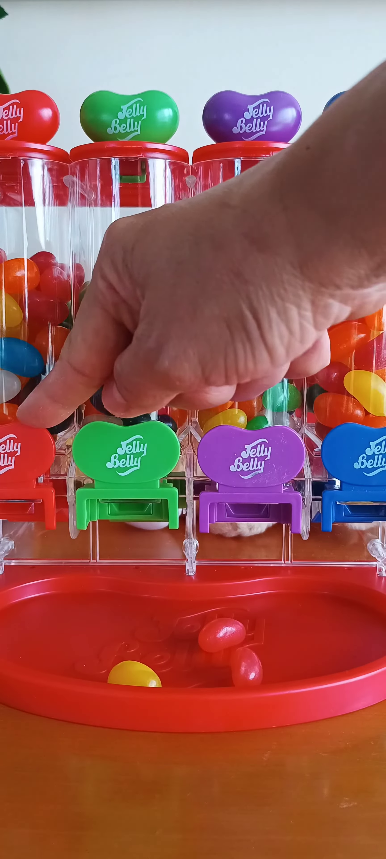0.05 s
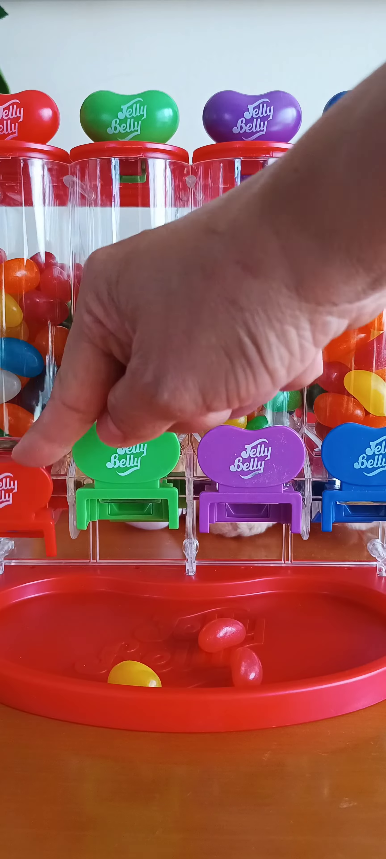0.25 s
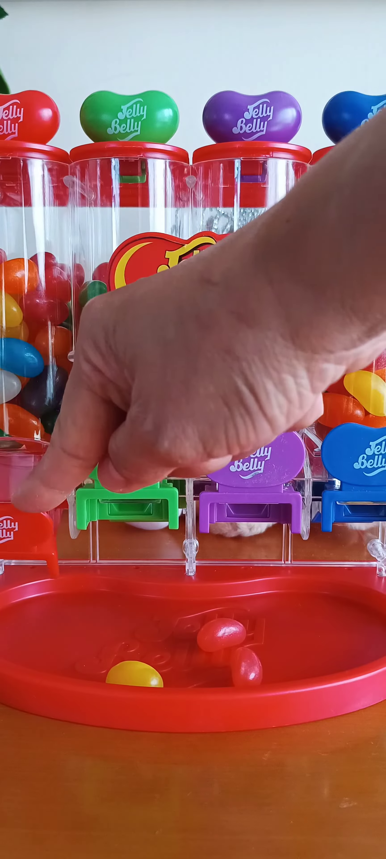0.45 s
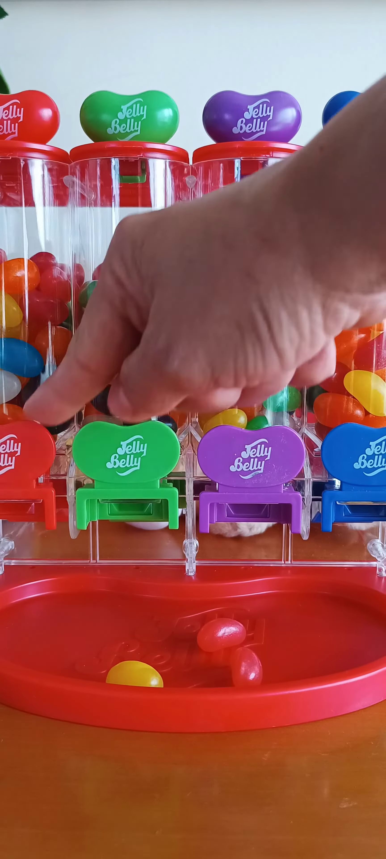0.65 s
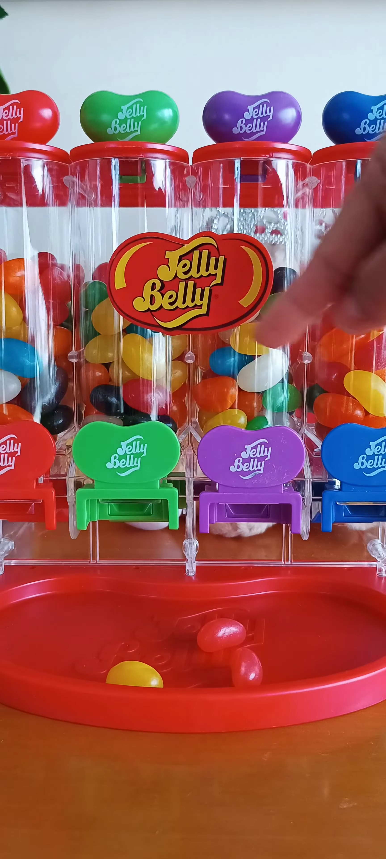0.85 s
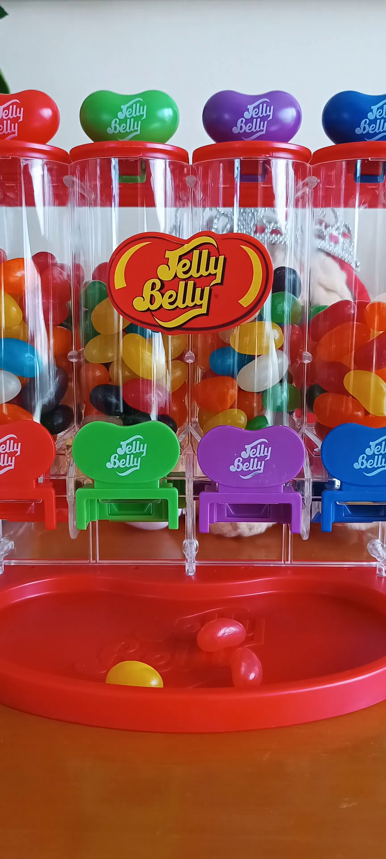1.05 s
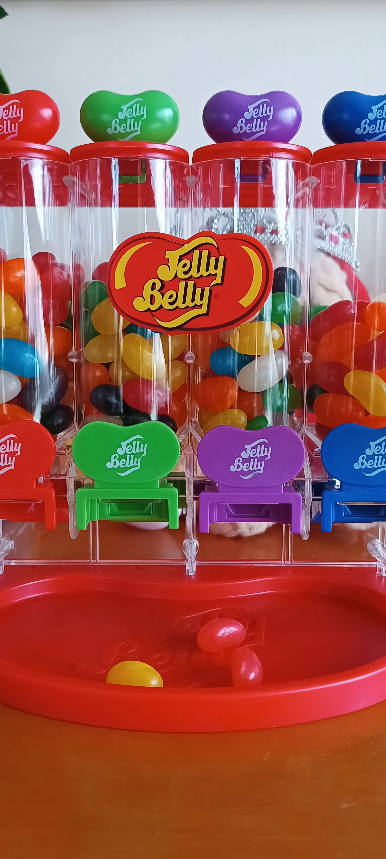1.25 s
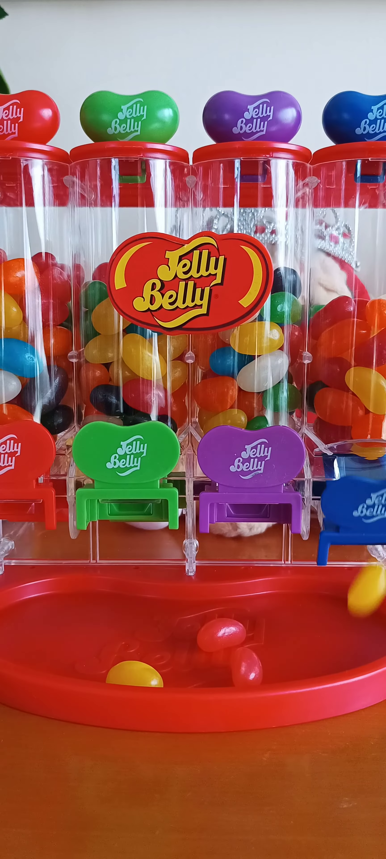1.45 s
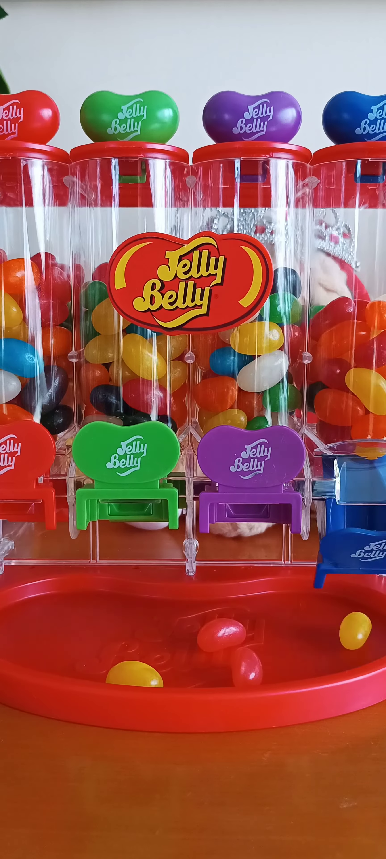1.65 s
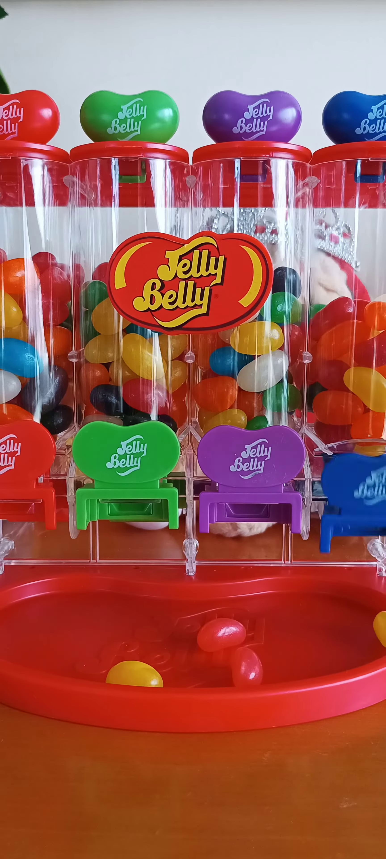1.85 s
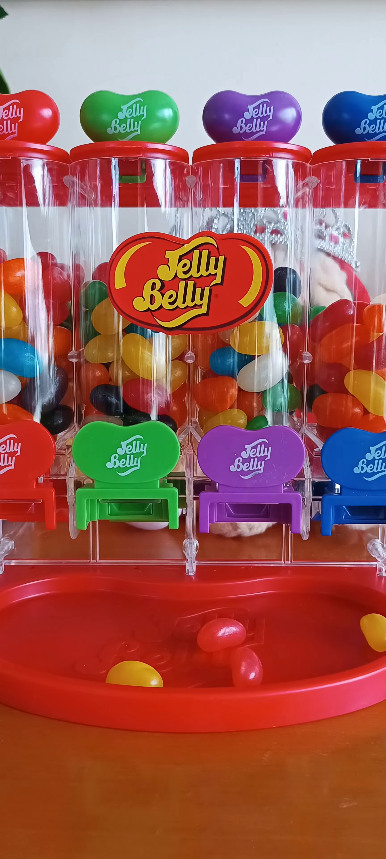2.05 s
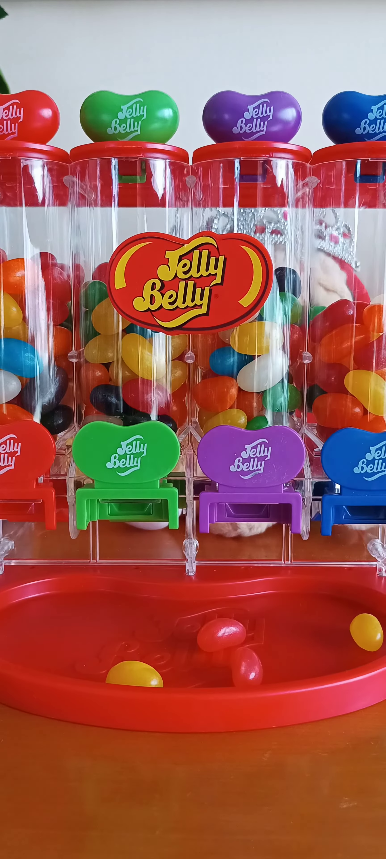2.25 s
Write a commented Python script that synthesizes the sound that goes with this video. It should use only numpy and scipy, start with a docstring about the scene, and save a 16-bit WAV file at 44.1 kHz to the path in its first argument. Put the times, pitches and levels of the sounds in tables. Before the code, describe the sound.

Plastic levers clack and small candy beans rattle out of a dispenser, twice.

```python
"""Candy dispenser on a table

Close up in a small room, a plastic lever is pressed, beans tumble into the chute, and it knocks shut.
A second lever is pressed and scrapes back while a bean hops across the tray. Each hit is a brief
chatter that rings the housing, tray or stand; tumbling and scraping are showers of tiny contacts."""
import sys
import numpy as np
from scipy import signal
from scipy.fft import rfft, irfft
from scipy.io import wavfile

SR = 44100
rng = np.random.default_rng(int(sys.argv[2]) if len(sys.argv) > 2 else 0)


def transcribe(u):
    """Save the signal u as a 16-bit wav file named by the first command-line argument.

    u: samples, shape (n,) or (channels, n), limited to [-1, 1]; the rate is SR.
    q: integer samples, one column per channel.
    """
    v = np.clip(np.atleast_2d(u).T, -1, 1)
    q = np.round(v * 32767).astype(np.int16)
    wavfile.write(sys.argv[1], SR, q)


N = 101429
HIT_SAMPLES, TOP_HZ = 8192, 16000
HZ, T = np.fft.rfftfreq(HIT_SAMPLES, 1 / SR), np.arange(HIT_SAMPLES) / SR  # axes of one hit


def amp(db):
    return 10 ** (np.asarray(db) / 20)


def unit_rms(x):
    return x / np.sqrt(np.mean(x ** 2) + 1e-20)


def curve(points, hz):
    """Read (Hz, value) points along a log frequency axis."""
    freqs, values = np.transpose(points)
    return np.interp(np.log(hz + 1), np.log(np.maximum(freqs, 1)), values)


def fader(points):
    """Gain at every sample from (s, dB) points."""
    return amp(np.interp(np.arange(N) / SR, *np.transpose(points)))


def add(mix, start, sound):
    part = mix[:, max(round(start * SR), 0):][:, :sound.shape[1]]
    part += sound[:, :part.shape[1]]


def stereo(a, b, likeness, pan_db=0):
    """Left and right from two unrelated signals; positive pan leans left."""
    mid, side = a * np.sqrt((1 + likeness) / 2), b * np.sqrt((1 - likeness) / 2)
    return np.array([mid + side, mid - side]) * unit_rms(amp([[pan_db / 2], [-pan_db / 2]]))


def body(colour, modes=(), tilt_db=0):
    """An object's causal response: a broad colour with (Hz, width Hz, dB) resonances on top."""
    log_gain = np.log(amp(curve(colour, HZ) + tilt_db))
    mirrored = np.concatenate([log_gain, log_gain[-2:0:-1]])
    broad = np.exp(np.conj(signal.hilbert(mirrored)))[:len(HZ)]  # minimum phase
    return broad * (1 + sum(amp(db) / (1 + 2j * (HZ - hz) / width) for hz, width, db in modes))


def strike(response, hold_s, t60, likeness, pan_db, band_hz):
    """A first touch and a brief chatter ring a body; the level is set within the given band."""
    rise_s, first_touch = .00021, .34
    envelope = (1 - np.exp(-T / rise_s)) * amp(-60 * np.maximum(T - hold_s, 0) / t60)
    contact = rfft(rng.standard_normal((2, HIT_SAMPLES)) * envelope)
    chatter = irfft(contact / (abs(contact) + 1e-12)) * envelope ** .25  # even push at all frequencies
    spectrum = (rfft(chatter) + [[first_touch], [0]]) * response
    in_band = irfft(spectrum * ((HZ > band_hz[0]) & (HZ < band_hz[1])))
    spectrum /= np.sqrt((in_band ** 2).sum(1, keepdims=True) / (.009 * SR))  # as 9 ms at unit level
    fade = np.cos(np.pi / 2 * T / T[-1]) ** 2
    return stereo(*irfft(spectrum), likeness, pan_db) * fade


def grains(response, per_s, spread_db, likeness, pan_db):
    """A steady shower of tiny contacts of uneven size into a body."""
    sizes = amp(spread_db * np.minimum(rng.exponential(1, (2, N)), 3))
    signs = rng.choice([-1, 1], (2, N))
    clicks = sizes * signs * (rng.random((2, N)) < per_s / SR)
    shower = signal.fftconvolve(clicks, irfft(response)[None], axes=1)[:, :N]
    return stereo(*unit_rms(shower), likeness, pan_db)


def noise(colour, likeness):
    """A steady bed of coloured noise."""
    gain = amp(curve(colour, np.fft.rfftfreq(N, 1 / SR)))
    bed = irfft(rfft(rng.standard_normal((2, N))) * gain, N)
    return stereo(*unit_rms(bed), likeness)


# Hits on the housing. Each row: start in seconds, level in dB, extra bass in dB, extra treble in dB,
# strongest ring in Hz.
CLACKS = [(.062, -75, 4.5, 22, 8600), (0.2288, -47.5, 17, 0.5, 346), (.233, -37.5, -2.5, -8.5, 2158),
          (.239, -34.5, -9.5, -9.5, 3560), (.244, -38, 3, -4.5, 5220), (0.3478, -39.5, 3.5, -2, 2760),
          (.395, -20.5, 2.5, 7, 2340), (.4172, -23.5, 3, 4.5, 1146), (0.4372, -19.5, -9, 7.5, 3620),
          (.459, -21, 2, -5, 2120), (.4836, -29, -1, 0.5, 2470), (0.5224, -24.5, 0, -3.5, 2360),
          (.543, -26, -2, -5, 2720), (.577, -29, -5, -7, 1130), (.59, -35, -3, -4.5, 1130),
          (.603, -31, -3, -3, 960), (0.6993, -22, 2.5, 6.5, 2210), (0.8057, -36, -3, -27.5, 1220),
          (1.3681, -21, 0.5, -1.5, 2260), (1.3903, -28, -3, -2.5, 2890), (1.516, -35.5, 7, 12, 930),
          (1.532, -22.5, -2.5, 7, 2200), (1.5691, -22.5, -0.5, 2, 2460), (1.585, -29, 2.5, 5, 3040),
          (1.613, -22, 0.5, 2.5, 1220), (1.637, -34.5, 10.5, 13, 1090), (1.654, -29.5, 4.5, 2.5, 1152),
          (1.7835, -43.5, -2, 7, 4410), (1.7895, -36, -1, 6.5, 1650), (1.9253, -28.5, -3, 1.5, 2700),
          (1.9577, -29.5, 4.5, -3, 3500), (1.995, -21, -4, 4, 2790), (2.0045, -26.5, -5, -3, 3580),
          (2.0105, -27, -3.5, 9, 2180), (2.019, -17.5, -21, -3.5, 3560), (2.0804, -37, -4, 0.5, 2290)]
# The housing's tone. Each row: frequency in Hz, gain in dB.
HOUSING_COLOUR = [(150, -40), (300, -5), (550, -4), (1000, 0.5), (1600, -3.5), (2400, 1.5), (4200, -3.5),
                  (6000, -8), (8500, -20), (13600, -24.5), (15000, -20.5)]
# Its resonances. Each row: frequency in Hz, width in Hz, gain in dB.
HOUSING_MODES = [(780, 60, 2.5), (1131, 42, -0.5), (2240, 130, 4.5), (2720, 83, 3), (3511, 90, 6),
                 (5016, 160, 4)]


def clacks():
    """Levers and beans strike the housing; each spot has its own colour and strongest ring."""
    out = np.zeros((2, N))
    for start, db, bass_db, treble_db, ring_hz in CLACKS:
        tilt_db = curve([(900, bass_db), (1900, 0), (3400, 0), (6500, treble_db)], HZ)
        spot_modes = [(hz, 130, 2) for hz in rng.uniform(3800, TOP_HZ, size=14)]
        housing = body(HOUSING_COLOUR, HOUSING_MODES + spot_modes + [(ring_hz, 150, 10.5)], tilt_db)
        clack = strike(housing, hold_s=.004, t60=.021, likeness=.5, pan_db=1.5, band_hz=(1200, 4200))
        add(out, start, amp(db) * clack)
    return out


# Taps on the tray. Each row: start in seconds, level in dB, pitch in Hz.
TRAY_TAPS = [(.3955, -21, 696.5), (1.369, -31.5, 736), (1.644, -26, 888), (1.7375, -44.5, 743),
             (1.7621, -46.5, 696), (1.891, -49.5, 790), (1.941, -44.5, 1100), (2.198, -46.5, 800),
             (2.2212, -47.5, 776), (2.247, -50.5, 625)]
# The tray's hollow tone. Each row: frequency in Hz, gain in dB.
TRAY_COLOUR = [(200, -35.5), (450, -0.5), (800, -3), (1300, -11), (1900, -13.5), (3000, -23.5),
               (15000, -55)]


def tray_taps():
    """The tray gives a short hollow tap when a lever jolts it or a hopping bean lands."""
    out = np.zeros((2, N))
    for start, db, hz in TRAY_TAPS:
        tray = body(TRAY_COLOUR, [(hz, 79, 11)])
        tap = strike(tray, hold_s=.0029, t60=.036, likeness=.75, pan_db=4.5, band_hz=(200, 4000))
        add(out, start, amp(db) * tap)
    return out


# Low thumps. Each row: start in seconds, level in dB, ring in Hz.
THUMPS = [(.229, -46.5, 334.6), (.33, -54, 135.2), (0.7, -43.5, 151.7), (.906, -29, 220), (1.37, -46, 302),
          (2.015, -45, 279)]
# The stand's dull tone. Each row: frequency in Hz, gain in dB.
STAND_COLOUR = [(25, -26.5), (90, -23), (130, -3.5), (175, -15), (250, -1.5), (400, -7), (3000, -75)]


def stand_thumps():
    """Hard blows knock the whole stand against the table."""
    out = np.zeros((2, N))
    for start, db, hz in THUMPS:
        stand = body(STAND_COLOUR, [(hz, 48, 7.5)])
        thump = strike(stand, hold_s=.0086, t60=.051, likeness=.93, pan_db=-.68, band_hz=(50, 800))
        add(out, start, amp(db) * thump)
    return out


# The snap's tone. Each row: frequency in Hz, gain in dB.
SNAP_COLOUR = [(100, -31), (300, -3), (1000, -2.5), (1400, -10), (2000, 4.5), (2600, 2), (3600, 0.5),
               (4200, -10), (6500, -16.5), (9000, -46.5)]
# The frame's ring. Each row: frequency in Hz, relative level in dB, seconds to fall 60 dB.
FRAME_MODES = [(273.6, -1.5, 0.066), (471, -4, .1), (591, 1.5, 0.095), (777, -6.5, 0.11), (2475, 2, 0.094),
               (3690, -3.5, 0.093), (4700, -12.5, 0.12)]


def lever_snap(start=.9045):
    """The first lever snaps shut and sets the frame ringing."""
    out = np.zeros((2, N))
    snap = strike(body(SNAP_COLOUR), hold_s=.00036, t60=.027, likeness=.21, pan_db=-1.2,
                  band_hz=(200, 8000))
    partials = sum(amp(db - 60 * T / t60) * np.sin(2 * np.pi * (hz * T + rng.random((2, 1))))
                   for hz, db, t60 in FRAME_MODES)
    ring = stereo(*partials, likeness=.59) * (1 - np.exp(-T / .003))
    add(out, start, amp(-22.5) * snap + amp(-27.5) * ring)
    return out


# Two pours of beans. Each row: time in seconds, level in dB.
TUMBLE_FADER = [(.39, -79), (.405, -31.5), (.63, -38), (.69, -38.5), (.735, -34.5), (.775, -48),
                (.81, -45.5), (.84, -78.5), (1.51, -71.5), (1.52, -27), (1.56, -32), (1.6, -43.5),
                (1.625, -25), (1.66, -32.5), (1.69, -86)]
# The rattle's tone. Each row: frequency in Hz, gain in dB.
BEAN_COLOUR = [(150, -26.5), (320, 1.5), (600, -6), (1150, 5), (1600, 1), (2400, -3.5), (3500, -8),
               (6000, -11.5), (8500, -33), (15000, -40.5)]


def bean_tumble():
    """Beans jostle down the chute and ring the housing."""
    chute = body(BEAN_COLOUR, HOUSING_MODES)
    return fader(TUMBLE_FADER) * grains(chute, per_s=1300, spread_db=3, likeness=.37, pan_db=2.5)


# Swells of the scrape. Each row: time in seconds, level in dB.
SCRAPE_FADER = [(.1, -90), (.22, -67.5), (.25, -53), (.29, -55), (.302, -44), (.35, -42.5), (.38, -80),
                (1.39, -85.5), (1.4, -45.5), (1.425, -45.5), (1.435, -31.5), (1.444, -49.5), (1.468, -62),
                (1.478, -48), (1.49, -68.5), (1.86, -79.5), (1.9, -56), (1.975, -52), (1.99, -32),
                (2.03, -43.5), (2.07, -60), (2.11, -52.5), (2.135, -91), (2.18, -65.5), (2.22, -85.5)]
# The slot's tone. Each row: frequency in Hz, gain in dB.
SLOT_COLOUR = [(150, -24), (400, -5), (900, -2), (1300, -5), (2900, -2), (3700, -9), (4300, -6),
               (6500, -8.5), (8500, -27.5), (15000, -26)]
# Its resonances. Each row: frequency in Hz, width in Hz, gain in dB.
SLOT_MODES = [(2830, 90, 10.5), (3492, 47, 13), (1780, 80, 6.5)]


def lever_scrape():
    """The levers stick and slip as they slide in their slots."""
    slot = body(SLOT_COLOUR, SLOT_MODES)
    return fader(SCRAPE_FADER) * grains(slot, per_s=2500, spread_db=7, likeness=.25, pan_db=5.3)


# The small room's decay. Each row: frequency in Hz, seconds to fall 60 dB.
ROOM_DECAY = [(150, .2), (400, 0.2), (1000, 0.14), (6000, 0.13), (15000, 0.11)]


def room(x, echoes_per_s=4000, predelay_s=.0025):
    """A short tail of reflections, each band dying at its own speed."""
    length = SR // 2
    echoes = rng.standard_normal((2, length)) * (rng.random((2, length)) < echoes_per_s / SR)
    hz, t, bands = signal.stft(stereo(*echoes, likeness=1), SR, nperseg=256)
    decay = amp(-60 * t / curve(ROOM_DECAY, hz)[:, None])
    tail = signal.istft(bands * decay, SR, nperseg=256)[1]
    tail *= np.clip(np.arange(tail.shape[1]) / SR / predelay_s - 1, 0, 1)
    tail /= np.linalg.norm(tail, axis=1, keepdims=True)
    return signal.fftconvolve(x, tail, axes=1)[:, :N]


# Swells of the rumble. Each row: time in seconds, level in dB.
RUMBLE_FADER = [(0, -82.5), (.8, -62), (.88, -67), (.96, -49), (1.04, -80), (1.12, -60), (1.2, -57),
                (1.38, -81.5), (1.49, -65), (1.75, -82), (2.3, -86)]
# Its deep tone. Each row: frequency in Hz, gain in dB.
RUMBLE_COLOUR = [(15, -9), (40, -9), (78, 1.5), (115, -5.5), (200, -18), (2000, -69.5)]


def rumble():
    """A low rumble comes and goes, almost mono."""
    return fader(RUMBLE_FADER) * noise(RUMBLE_COLOUR, likeness=.97)


# Room tone. Each row: frequency in Hz, gain in dB.
AIR_COLOUR = [(60, -15), (170, -17.5), (260, -10), (550, -22), (1000, -27.5), (2000, -26), (3300, -39),
              (16000, -52.5)]


def air():
    """A faint, wide hush sits under everything."""
    return amp(-71.5) * noise(AIR_COLOUR, likeness=.14)


def scene():
    dispenser = clacks() + tray_taps() + stand_thumps() + lever_snap() + bean_tumble() + lever_scrape()
    return dispenser + amp(-12) * room(dispenser) + rumble() + air()


def record(dry):
    """The left microphone hears more mids, the pair part in phase in the treble, and the top is cut."""
    hz = np.fft.rfftfreq(N, 1 / SR)
    lean_db = curve([(450, -1.5), (1100, 5), (2000, -1.5), (5000, -2), (9000, 2), (15000, .5)], hz)
    phase_gap_rad = curve([(2800, 0), (5000, 1.7)], hz)
    turn = np.exp(.5j * phase_gap_rad)
    microphones = amp([lean_db / 2, -lean_db / 2]) * np.array([turn, 1 / turn])
    heard = irfft(rfft(dry) * microphones, N)
    lowpass = signal.firwin(255, TOP_HZ, window=("kaiser", 9), fs=SR)
    return signal.oaconvolve(heard, lowpass[None], "same")


dry = scene()
out = record(dry)
transcribe(out)
```